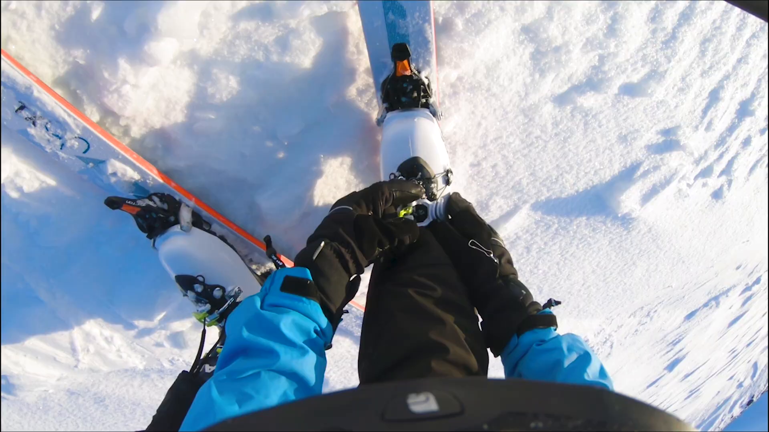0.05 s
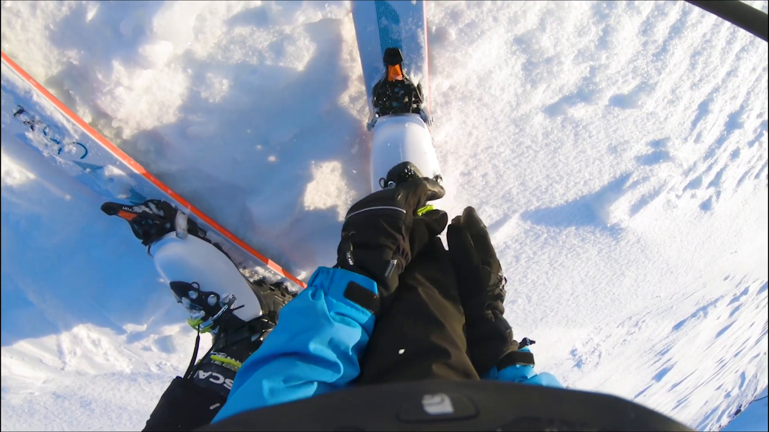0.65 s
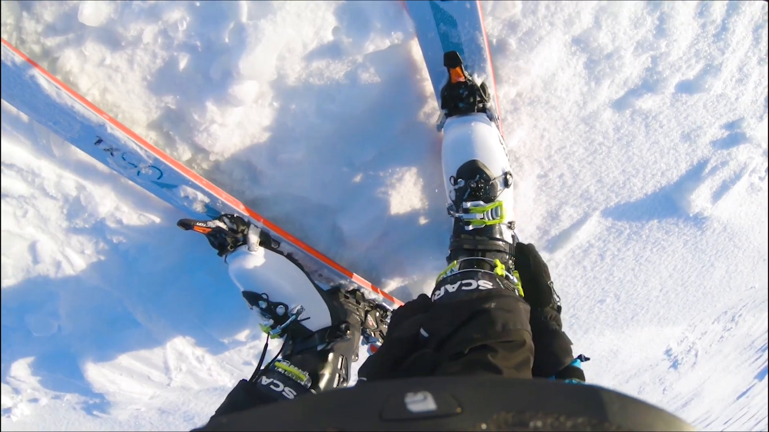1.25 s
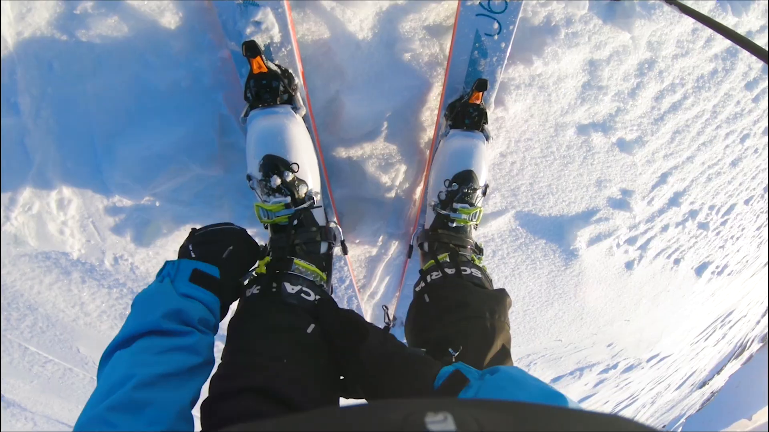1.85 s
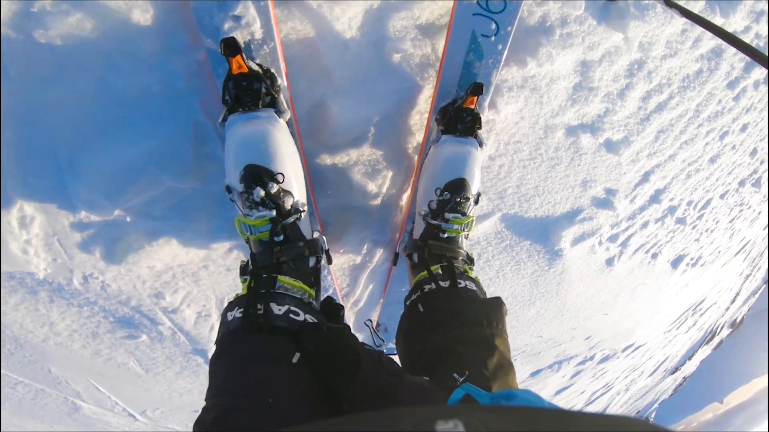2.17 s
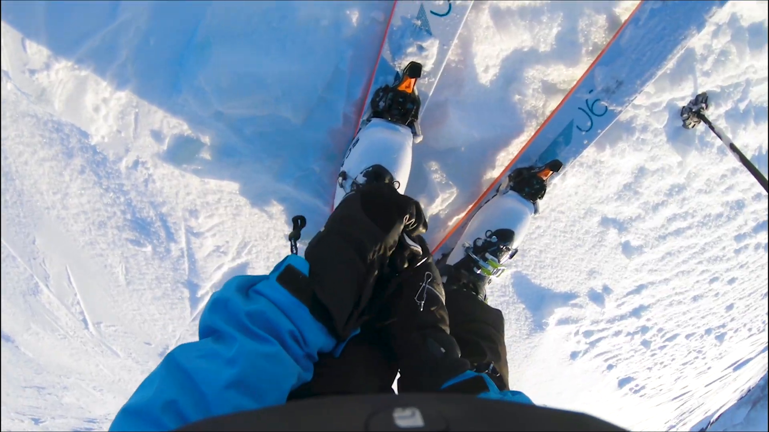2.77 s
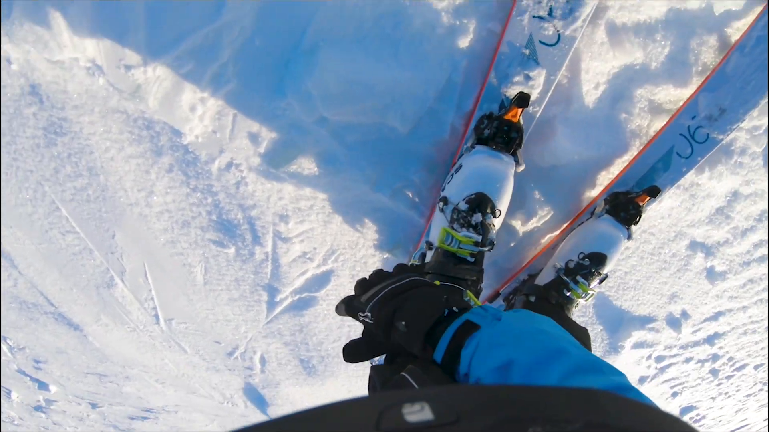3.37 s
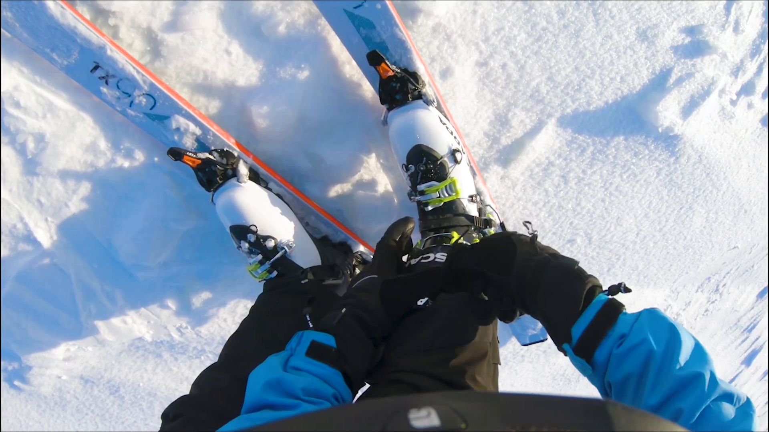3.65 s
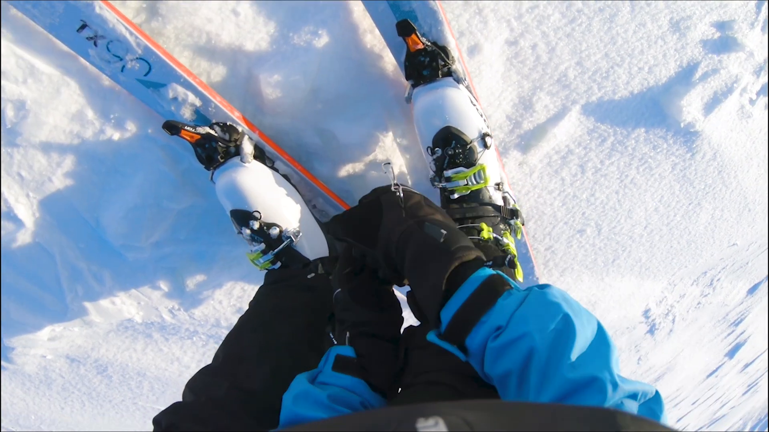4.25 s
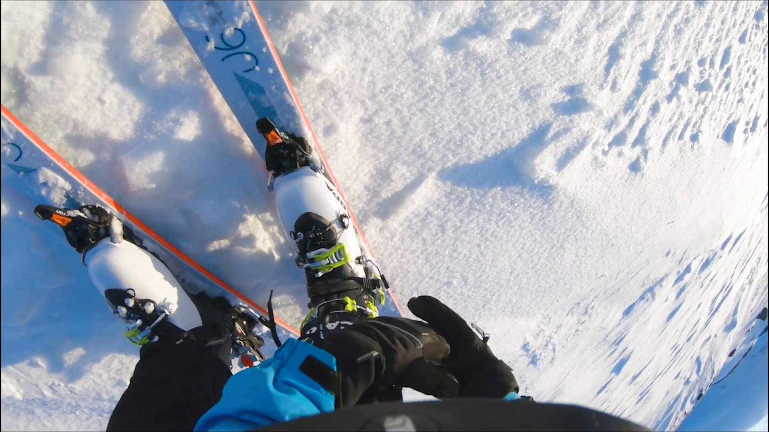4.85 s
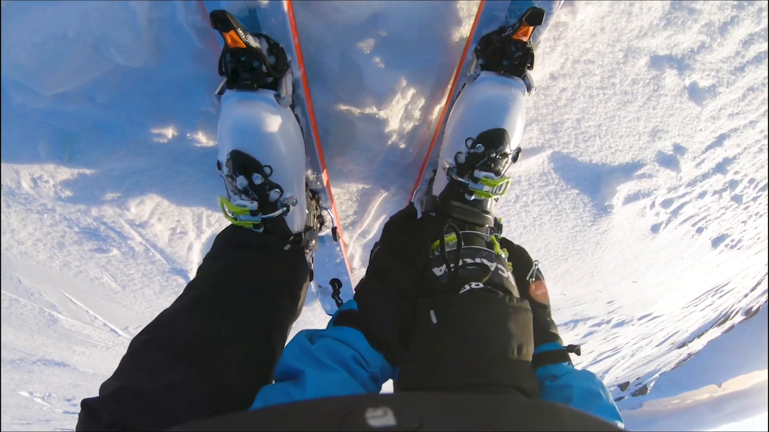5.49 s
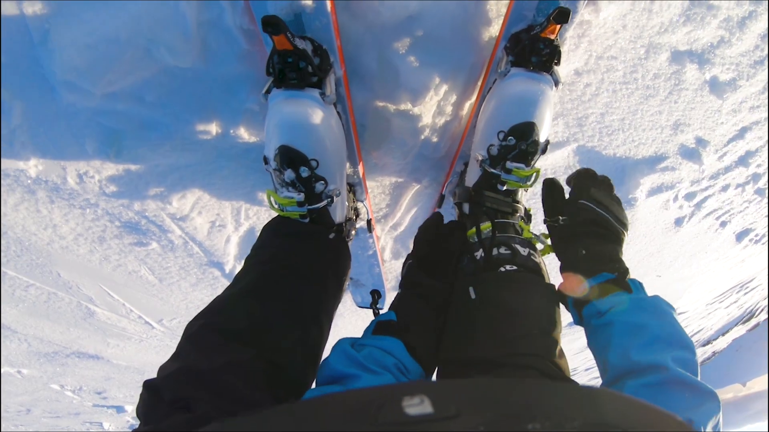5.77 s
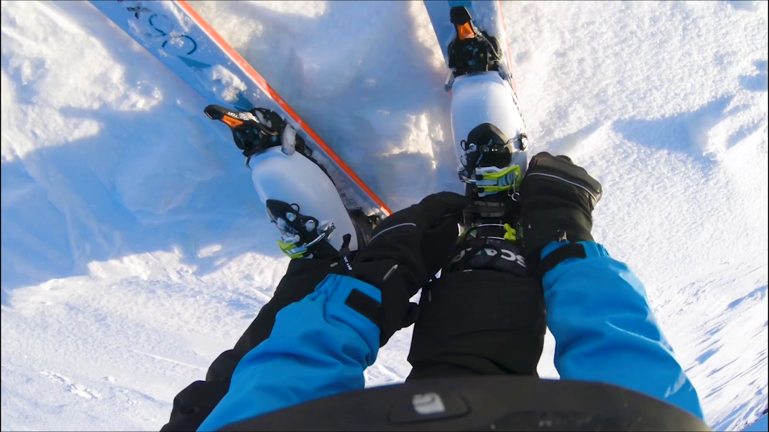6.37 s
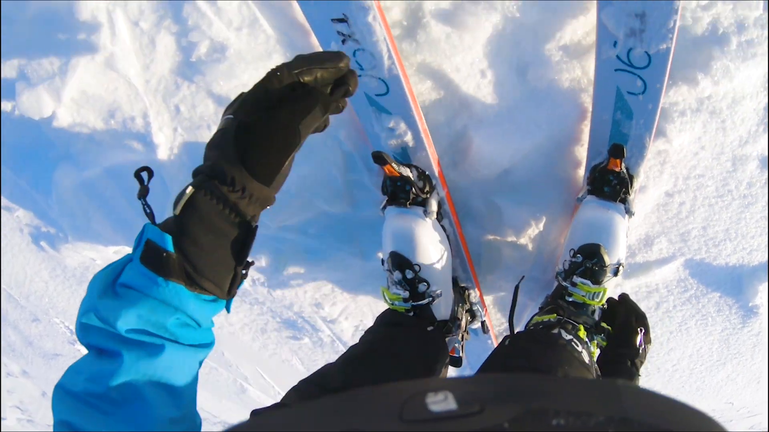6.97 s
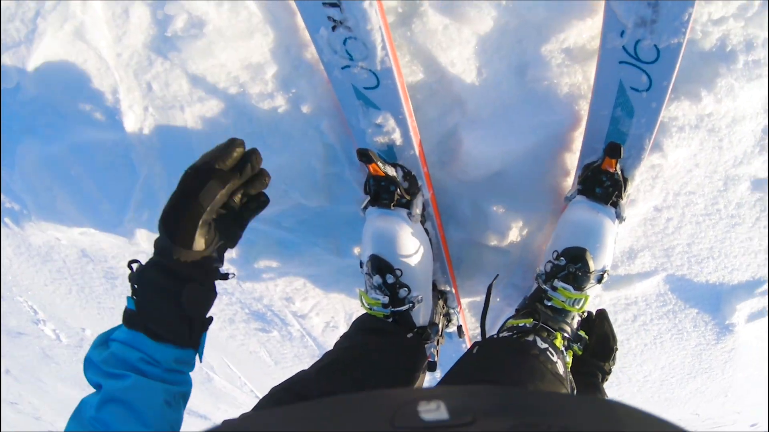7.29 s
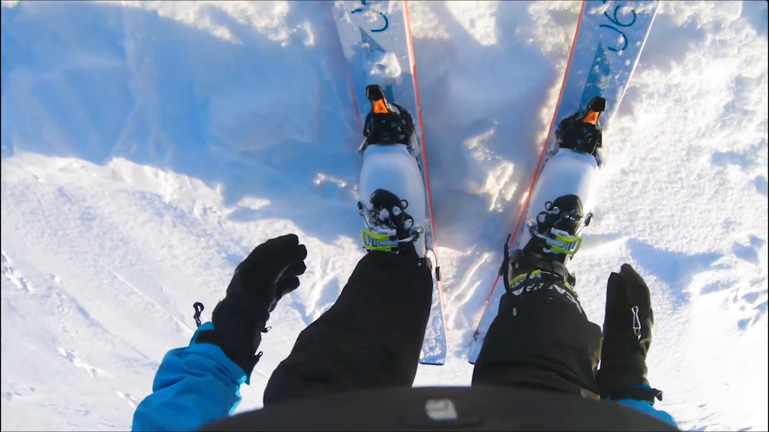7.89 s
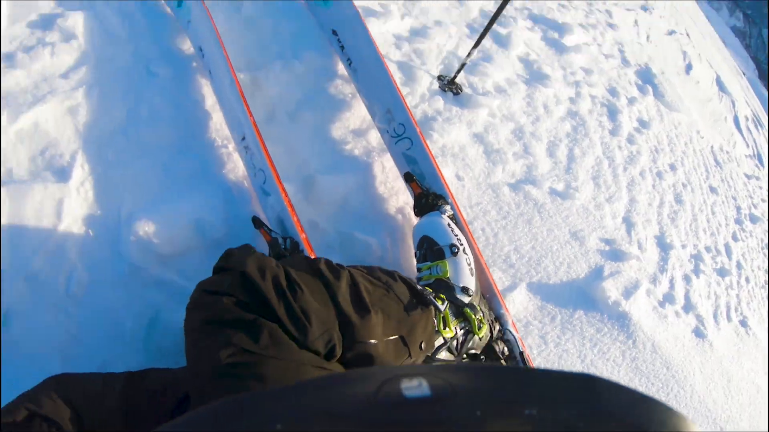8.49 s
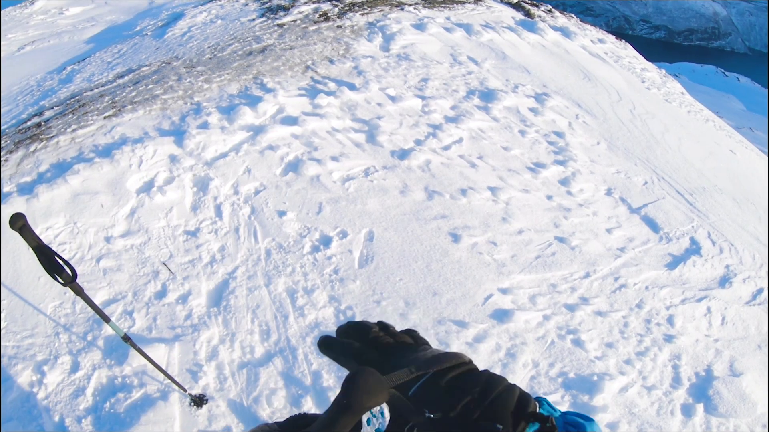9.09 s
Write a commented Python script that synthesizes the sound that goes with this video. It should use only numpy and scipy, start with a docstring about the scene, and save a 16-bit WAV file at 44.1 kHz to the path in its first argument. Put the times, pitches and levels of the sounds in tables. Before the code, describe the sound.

A skier fastens plastic ski boots on crusty snow, heard close from a helmet microphone. Buckles and bindings snap first, then two hook-and-loop straps rip open and a ratchet ticks. More buckles shut, a cuff creaks, and another ratchet is cranked tight before a last snap and swishing sleeves. Throughout, skis grind in the snow, nylon rustles and light wind buffets the microphone, with occasional low thumps.

```python
"""A skier on crusty snow closes the ski boots, heard from a helmet camera. First, buckles and bindings
snap on the plastic shells. Two hook-and-loop straps are ripped open, then a ratchet ticks. More buckles
shut, a cuff creaks, a ratchet buckle is cranked tight, and at the end the skier straightens up with
swishing sleeves. All along, skis grind in the snow, nylon clothes rustle, light wind buffets the
microphone and now and then the helmet mount shudders."""
import sys
import numpy as np
from scipy import signal
from scipy.fft import rfft, irfft, next_fast_len
from scipy.io import wavfile
from scipy.ndimage import map_coordinates

SR = 44100
rng = np.random.default_rng(int(sys.argv[2]) if len(sys.argv) > 2 else 0)


def pcm_store(signal):
    """Save signal as 16-bit PCM."""
    levels = np.round(np.clip(np.atleast_2d(signal), -1, 1) * 32767)
    wavfile.write(sys.argv[1], SR, levels.astype(np.int16).T)


N = 402633
LEAD_S = .003  # a faint noise rises for this long just before each click
PLASTIC_TOP_HZ = 6950  # the boot rings little above this

# tones of a knocked boot shell: pitch_hz, width_hz, level_db
SHELL_TONES = [(189, 70, 0), (380, 163, -4), (490, 105, -1.5), (721, 225, 0), (917, 185, 1.5),
               (1112, 260, 0), (1600, 540, -9)]
# tones of the air and walls of a closed boot: pitch_hz, width_hz, level_db
HOLLOW_TONES = [(366, 35, -14), (550, 28, -5.5), (824, 45, 0.5), (1127, 29, 5.5), (1290, 50, -7)]


def amp(db):
    """Turns decibels into a gain."""
    return np.exp(np.asarray(db) * (np.log(10) / 20))


def unit(x):
    """Scales a signal to an average (rms) level of 1."""
    return x / np.sqrt(np.mean(x ** 2) + 1e-20)


def sized(x):
    """Gives a short stereo sound the energy of 1 ms at level 1."""
    return x / np.sqrt(np.sum(x ** 2) / (2 * SR / 1000))


def along(points, hz):
    """Reads between (Hz, value) points on a log axis."""
    point_hz, values = np.transpose(points)
    return np.interp(np.log(hz + 1), np.log(point_hz + 1), values)


def curves(rows):
    """One value per sample for each column after the time."""
    times, *columns = np.transpose(rows)
    return [np.interp(np.arange(N) / SR, times, column) for column in columns]


def wobble(rate, step=16):
    """A smooth curve through rate random values a second."""
    steps = np.arange(0, N + step, step)
    coarse = map_coordinates(rng.standard_normal(int(N * rate / SR) + 4), [steps * rate / SR])
    return np.interp(np.arange(N), steps, coarse)


def panned(left_db):
    """Two gains, the left one left_db louder than the right."""
    return unit(amp([[left_db / 2], [-left_db / 2]]))


def add(track, start_s, sound):
    """Mixes a sound into a track."""
    k = int(np.clip(round(start_s * SR), 0, N - 1))
    track[:, k:k + sound.shape[1]] += sound[:, :N - k]


def swells(rows, rise_s, fall_s, arch_db=0):
    """A gain curve from (start_s, length_s, level_db) rows, each arch_db weaker at its ends."""
    gain = np.zeros((1, N))
    for start, length, db in rows:
        t = np.arange(int(length * SR)) / SR
        edges = np.clip(np.minimum(t / rise_s, (length - t) / fall_s), 0, 1)
        arch = amp(db - arch_db * (2 * t / length - 1) ** 2)
        add(gain, start, (edges * arch)[None])
    return gain[0]


def filtered(x, response):
    """Filters x by a function of frequency."""
    size = 2 * next_fast_len(x.shape[-1] // 2 + 2048)
    return irfft(rfft(x, size) * response(np.fft.rfftfreq(size, 1 / SR)), size)[..., :x.shape[-1]]


def colour(points, hz):
    """A filter with the given (Hz, dB) spectrum that never sounds ahead of its input."""
    cepstrum = irfft(np.log(amp(along(points, hz))))
    half = len(cepstrum) // 2
    cepstrum[1:half] *= 2
    cepstrum[half + 1:] = 0
    return np.exp(rfft(cepstrum))


def resonances(tones, hz):
    """A filter that rings at (pitch_hz, width_hz, level_db) tones; wider ones die sooner."""
    return sum((-1) ** k * amp(db) * 1j * hz * width / (pitch ** 2 - hz ** 2 + 1j * hz * width)
               for k, (pitch, width, db) in enumerate(tones))


def ringing(x, tones, top_hz=PLASTIC_TOP_HZ, pitch_ratio=1, steepness=4):
    """Lets x ring an object's tones, dulled above top_hz."""
    return filtered(x, lambda hz: resonances(tones, hz / pitch_ratio) / (1 + (hz / top_hz) ** steepness))


def stereo(pair, spectrum):
    """Turns two unrelated noises into a partly alike left and right with the given spectrum."""
    # how alike the two sides are: pitch_hz, likeness (1 = the same)
    likeness = [(40, 0.21), (200, 0.59), (700, 0.46), (3000, 0.92), (5000, 0.91), (7000, 0.47),
                (15000, 0.13)]

    def response(hz):
        angle = np.arccos(along(likeness, hz)) / 2
        return colour(spectrum, hz) * [np.cos(angle), np.sin(angle)]
    mid, side = filtered(pair, response)
    return unit(np.array([mid + side, mid - side]))


def grains(per_s, spread_db, life_s, smooth):
    """Two noises made of tiny breaks of uneven size, over a share of smooth hiss."""
    sizes = amp(spread_db * np.minimum(rng.exponential(size=N), 4))
    sizes *= rng.random(N) < per_s / SR
    power = signal.lfilter([1], [1, -np.exp(-1 / (life_s * SR))], sizes ** 2 / per_s)
    return np.sqrt(power / power.mean() + smooth ** 2) * rng.standard_normal((2, N))


def contact(chatter_s, rattle_db, rattle_s, width, blow_db=-3):
    """A faint rise of noise, one clean blow, then chatter and rattle, each 60 dB down in its time."""
    t = np.arange(SR // 12) / SR - LEAD_S
    dying = amp(-60 * np.abs(t) / chatter_s) + amp(rattle_db - 60 * np.abs(t) / rattle_s)
    rising = amp(-19.5 + 12 * t / LEAD_S)
    mid, side = rng.standard_normal((2, len(t))) * np.where(t < 0, rising, dying)
    mid += amp(blow_db) * np.linalg.norm(mid) * signal.unit_impulse(len(t), int(LEAD_S * SR))
    return np.array([mid + width * side, mid - width * side])


def buckles():
    """Levers and a ratchet's catch strike home: the metal rings briefly and knocks the shell."""
    # levers shutting: time_s, level_db, knock_db, left_db, tones as (pitch_hz, level_db)
    levers = [(0.6622, -4.5, -6.5, 3.5, [(2050, -3), (2650, -1.5), (3750, 1), (4200, 2.5), (7200, -5)]),
              (1.1233, -8, -4, -1.5, [(1400, -9), (2700, 3.5), (3550, -4.5), (5700, -1), (6700, -0.5)]),
              (5.5565, -11, -4.5, -2, [(1450, -3), (2300, 0), (4300, -4), (6100, 1.5), (6900, 0)]),
              (6.2205, -11.5, -3, -2.5, [(2200, 1.5), (3450, -1), (3900, -7.5), (5900, 2.5), (6750, -4)]),
              (7.562, -7.5, -6, -6.5, [(3000, -0.5), (4000, -1.5), (5700, -6), (6800, 2), (8000, 4)]),
              (8.481, -5.5, -10.5, -2.5, [(2500, -1), (3600, 0.5), (5600, -3), (6500, -1), (7450, 3)])]
    # a ratchet buckle cranked tight: time_s, level_db, knock_db, left_db
    clicks = [(7.796, -18, -11, 2), (7.802, -20.5, -9, -4), (7.8363, -11.5, -10, -2.5), (7.8624, -27, 4, 2),
              (7.883, -10.5, -5, -1), (7.897, -13.5, -7, 1.5), (7.9109, -10.5, -13, 1.5)]
    # tones of its catch: pitch_hz, level_db
    catch_tones = [(1120, -1.5), (2400, 2.5), (3000, -5.5), (6300, 4.5), (7100, 4.5)]
    # the bare tick under the tones: pitch_hz, level_db
    tick_spectrum = [(500, -29), (2000, -16), (7000, -10.5), (9500, -28), (12000, -30), (16000, -46)]
    out = np.zeros((2, N))
    for start, db, knock_db, left_db, tones in list(levers) + [(*row, catch_tones) for row in clicks]:
        def metal(hz):
            ring = resonances([(pitch, 380, level) for pitch, level in tones], hz)
            tick_and_ring = colour(tick_spectrum, hz) + ring / (1 + (hz / 9500) ** 8)
            width = np.clip((hz / 6500) ** 2, .25, 1.3)  # high tones spread wider
            return np.array([tick_and_ring, tick_and_ring * width])
        left, right = contact(chatter_s=.012, rattle_db=-23.5, rattle_s=.061, width=.98, blow_db=1)
        mid, side = filtered(np.array([left + right, left - right]), metal)
        click = sized(np.array([mid + side, mid - side]))
        knock = ringing(contact(chatter_s=.0046, rattle_db=-21, rattle_s=.056, width=.35), SHELL_TONES)
        add(out, start - LEAD_S, amp(db) * panned(left_db) * (click + amp(knock_db) * sized(knock)))
    return out


def snaps():
    """Loose catches, bindings and hard crust crack and knock the boot shell, with a bright, high ring."""
    # snaps: time_s, level_db, knock_db, ring_db, pitch_hz, left_db
    hits = [(0.0105, -17.5, -2, 2.5, 2460, -3.5), (0.414, -27, -25, 2, 3700, -1),
            (0.5723, -32, -18, -5, 2610, 0), (0.6021, -28, -7, -6, 3020, 0),
            (0.807, -32, -12, -2, 1990, 14), (0.8169, -30, -0.5, -6, 1580, 12),
            (0.933, -39.5, -19, 23, 5000.0, -1.5), (0.956, -28, 0, -4, 2090, -0.5),
            (1.1202, -27.5, 4, 0.5, 3320.0, 1), (1.262, -13, -2.5, -22, 2630, 1),
            (1.4248, -28.5, -3, -12, 1900, 1), (1.502, -25.5, -1, -13, 1900, -2),
            (1.536, -30, 3, -5, 2940, 0), (1.6282, -17.5, 0.5, -9, 2900, 0),
            (1.6613, -14.5, 0, -2, 2450, -4), (1.7656, -23, 1, 0.5, 2380, -2.5),
            (2.1724, -17, 4, -9, 3340, 2.5), (2.1893, -12, -2.5, -3.5, 1430, 5),
            (2.3208, -22, -5.5, -14, 3170, 5.5), (3.1443, -32, 7, -10, 1500, 0),
            (3.274, -32.5, -10, -5, 1720.0, 3), (3.5787, -36, 4.5, -13, 2570, -8),
            (4.37, -32.5, 0.5, -18, 2600, 6), (4.578, -22.5, -5, -24, 3280, 5),
            (4.6306, -31.5, -1, -16, 2280, 4), (4.903, -30.5, 2, -16, 3520, 3.5),
            (5.37, -32, -29, 1, 3960, -1), (5.407, -27.5, -14, -3, 3570, -1),
            (5.4699, -16.5, -8, -13, 3530, -1.5), (5.853, -30, -22, 2.5, 3750.0, -4),
            (5.8775, -28.5, 1, -2, 3100, -4), (6.0555, -20, -6, -11, 3740, 0.5),
            (6.112, -17, -7, 5, 4640, 1), (6.375, -36, -8, 10.5, 4900, 1),
            (6.386, -42, -22, 15, 4180.0, -1), (6.441, -31, -12.5, 5.5, 3900, 1),
            (6.529, -29, -17, -4.5, 3040, -1), (6.5615, -31, -31, -9, 3330, 6),
            (6.901, -30.5, -10, 4, 1810.0, 1), (6.9115, -17.5, -3.5, -0.5, 1580, -4.5),
            (6.9736, -31.5, 4.5, 2, 1510.0, -2.5), (6.995, -30, -6, -3, 2710.0, 3),
            (7.0547, -21.5, 7, 3.5, 3520, 1), (7.133, -30, -6, -6, 2230, -12),
            (7.1458, -26.5, -6, 4, 2930, 6), (7.1526, -40.5, 19, 18, 2450.0, -5),
            (7.201, -37.5, 9, 3.5, 2400, -1), (7.404, -27.5, 7, 1, 1720.0, 1),
            (7.6462, -27, -1.5, 0, 2970.0, -3), (7.7629, -16.5, 6, -3.5, 1480, -3),
            (8.072, -15, 2.5, -2.5, 2410.0, 0.5), (8.123, -14, -7.5, -19, 2900, 0),
            (8.141, -17.5, -11, -1, 2670, 1), (8.1437, -21, -13, 7.5, 2670.0, 4),
            (8.4791, -26, -7, -2, 2440, -5.5), (8.689, -33.5, 0, -12, 2920, -3),
            (8.737, -32, 2, -13, 4500, 3), (8.7392, -30, -10, -10.5, 4460, 1),
            (9.012, -36.5, -12, -19, 2320, -3)]
    # the sharp crack: pitch_hz, level_db
    crack_spectrum = [(500, -56.5), (1300, -0.5), (2000, 8), (4300, 8.5), (5600, -22.5), (9000, -39),
                      (16000, -81)]
    # a bright, high ringing heard with each snap: pitch_hz, level_db
    ring_spectrum = [(3500, -22), (5300, -1.5), (6600, 2.5), (7600, -4), (8600, -19), (11000, -31.5),
                     (16000, -47)]
    out = np.zeros((2, N))
    for start, db, knock_db, ring_db, pitch, left_db in hits:
        def cracking(hz):
            peaks = resonances([(pitch, 600, 0)], hz) + resonances([(pitch / 2, 400, -7)], hz)
            return colour(crack_spectrum, hz) * (.47 + peaks)
        crack = filtered(contact(chatter_s=.013, rattle_db=-24, rattle_s=.031, width=.18), cracking)
        knock = ringing(contact(chatter_s=.0027, rattle_db=-14, rattle_s=.04, width=.32), SHELL_TONES)
        ring_hit = contact(chatter_s=.009, rattle_db=-25, rattle_s=.048, width=.62)
        ring = filtered(ring_hit, lambda hz: colour(ring_spectrum, hz))
        snap = amp(.4) * sized(crack) + amp(ring_db + 2) * sized(ring)
        snap += amp(knock_db + .95) * sized(knock) * panned(-1.3)
        add(out, start - LEAD_S, amp(db) * panned(left_db) * snap)
    return out


def straps():
    """Slow pulls pop single hooks, fast ones tear thousands; the backing rasps, the strap adds body."""
    # pulls that peel a strap: start_s, length_s, tear_db, rasp_db, body_db, hooks_per_s
    pulls = [(2.382, 0.07, -42, -5, -23, 670), (2.44, 0.089, -29.5, -11, -22, 3800),
             (2.518, 0.048, -40.5, -14, -28, 2500), (2.558, 0.091, -34.5, -13, -19, 4500),
             (2.64, 0.081, -31, -13.5, -14, 6000), (2.704, 0.065, -26, -17.5, -14, 6300),
             (2.756, 0.094, -31, -17.5, -13.5, 2800), (2.909, 0.053, -44, -11, -13, 900),
             (2.986, 0.049, -33.5, -26, -13, 2000), (3.646, 0.047, -33, -3.5, -15, 4000),
             (3.68, 0.094, -45, 6, -31, 2500), (3.769, 0.041, -40.5, 7, -25, 6200),
             (3.797, 0.11, -32.5, -6, -12.5, 6900), (3.891, 0.24, -32.5, -6, -8, 6200),
             (4.118, 0.093, -41.5, -2, -8, 1500), (4.201, 0.054, -30.5, -7, -7, 3600),
             (4.256, 0.08, -27.5, -8.5, -12, 4500)]
    # rows of hooks giving way at once: time_s, tear_db, rasp_db
    tugs = [(2.398, -36.5, -4.5), (2.413, -32, -5), (2.424, -31, -9), (2.794, -30, -14.5),
            (2.957, -36.5, -11), (2.975, -37.5, -8), (3.65, -25, -1.5), (7.166, -28, -8),
            (7.173, -31.5, -11)]
    # the tearing hooks: pitch_hz, level_db
    hook_spectrum = [(250, -24.5), (700, -19), (1600, -10.5), (2500, -13), (3400, -2.5), (4800, -6.5),
                     (6000, -0.5), (7100, 4), (8300, -10), (9500, -12.5), (10800, -23.5), (12500, -23),
                     (16000, -32.5)]
    # the rasping backing: pitch_hz, level_db
    rasp_spectrum = [(400, -33), (1000, -18), (1650, -15), (2100, -3), (2700, 3), (3400, -3.5), (4500, -13),
                     (7000, -26)]
    # the tight strap: pitch_hz, level_db
    body_spectrum = [(200, -7.5), (500, -7.5), (1000, 3.5), (1500, 10), (2200, -18), (5000, -42.5)]
    pull_edges = dict(rise_s=.012, fall_s=.015)
    tear = swells([(s, length, db + 2) for s, length, db, *_ in pulls], **pull_edges)
    rasp = swells([(s, length, db + extra + 1) for s, length, db, extra, *_ in pulls], **pull_edges)
    body = swells([(s, length, db + extra) for s, length, db, _, extra, _ in pulls], **pull_edges)
    hooks_per_s = np.exp(curves([(s + length / 2, np.log(hooks)) for s, length, *_, hooks in pulls])[0])
    for start, tear_db, rasp_db in tugs:
        tug = swells([(start - LEAD_S / 2, .007, 0)], rise_s=.0007, fall_s=.0035)
        tear += amp(tear_db) * tug
        rasp += amp(tear_db + rasp_db) * tug
        hooks_per_s += 6000 * tug
    jerk_db = np.where(np.arange(N) / SR < 3.3, 1.6, 1.1)  # the first strap tears more jerkily
    pops = amp(jerk_db * wobble(170)) * grains(hooks_per_s, spread_db=3, life_s=.0003, smooth=.28)
    return (tear * stereo(pops, hook_spectrum) + rasp * stereo(pops, rasp_spectrum)
            + body * stereo(pops, body_spectrum))


def ratchet(teeth=8, start_s=4.939, gap_s=.0121, slowing=1.16):
    """A toothed strap ticks past its catch, slowing as it tightens; the catch rebounds between teeth."""
    # tones of one tick: pitch_hz, width_hz, level_db
    tooth_tones = [(1165, 106, 2.5), (1570, 440, -3), (2410, 710, -3.5), (3000, 560, -2.5), (3860, 730, -9)]
    out = np.zeros((2, N))
    for _ in range(teeth):
        for when, db in ((start_s, -24), (start_s + gap_s / 2, -35)):  # tooth, then rebound
            hit = contact(chatter_s=.003, rattle_db=-8, rattle_s=.05, width=.4)
            click = ringing(hit, tooth_tones, top_hz=5500)
            add(out, when - LEAD_S, amp(db) * panned(3.4) * sized(click))
        start_s += gap_s
        gap_s *= slowing
    return out


def cuff_creak():
    """The cuff sticks and slips unevenly; the slips ring the hollow boot, higher or lower with flex."""
    # the creak over time: time_s, tick_db, ring_db
    levels = [(6.62, -59, -63), (6.7, -44.5, -62), (6.78, -52.5, -75), (6.87, -46.5, -57),
              (7.05, -47, -50.5), (7.21, -56, -40), (7.28, -62, -76), (7.33, -51, -43.5), (7.42, -52, -43),
              (7.46, -75, -63)]
    # tones of the cuff: pitch_hz, width_hz, level_db
    cuff_tones = [(1100, 450, -4.5), (1750, 340, -0.5), (2860, 1040, -4), (6750, 600, -4.5)]
    slips_per_s = 80 * amp(2.6 * wobble(30))
    slip_count = np.floor(np.cumsum(slips_per_s) / SR)
    slips = np.diff(slip_count, prepend=0) * amp(2.4 * rng.standard_normal(N))
    flexed = wobble(14) > 0
    ticks = ringing(slips, cuff_tones, top_hz=8000, steepness=10)
    high_ring = ringing(slips * ~flexed, HOLLOW_TONES)
    low_ring = ringing(slips * flexed, HOLLOW_TONES, pitch_ratio=1 / 1.09)
    tick_db, ring_db = curves(levels)
    t = np.arange(N) / SR
    gate = np.clip(np.minimum(t - levels[0][0], levels[-1][0] - t) / .003 + 1, 0, 1)
    return gate * (amp(tick_db) * unit(ticks) + amp(ring_db) * unit(high_ring + low_ring))


def boot_bumps():
    """The closed boot rings hollow when a catch shuts or the shin bumps the cuff."""
    # bumps: time_s, level_db, pitch_ratio, top_hz
    bumps = [(2.172, -18, 0.92, 700), (6.112, -14, 1.0, 1800), (6.222, -19, 0.9, 500),
             (6.24, -20, 0.9, 1100), (7.404, -21, 0.96, 1500), (7.421, -24, 0.96, 1500)]
    out = np.zeros((2, N))
    for start, db, pitch_ratio, top_hz in bumps:
        hit = contact(chatter_s=.004, rattle_db=-22, rattle_s=.06, width=.4)
        add(out, start - LEAD_S, amp(db) * sized(ringing(hit, HOLLOW_TONES, top_hz, pitch_ratio)))
    return out


def crust_crunches():
    """Under boots and skis the crust gives way in short bursts of breaking grains."""
    # crunches: start_s, length_s, level_db
    crunches = [(0, 0.012, -26), (0.081, 0.037, -42.5), (1.258, 0.022, -31), (1.434, 0.041, -45),
                (1.504, 0.0085, -44.5), (1.538, 0.014, -45.5), (2.167, 0.021, -30.5), (3.267, 0.012, -38),
                (3.379, .02, -47.5), (7.152, 0.026, -29.5), (7.77, 0.0094, -26), (7.804, 0.015, -38.5),
                (8.085, 0.077, -28), (8.138, 0.032, -25.5)]
    # the breaking crust: pitch_hz, level_db
    crust_spectrum = [(100, 3.5), (250, 10), (450, 0.5), (800, 7.5), (1600, -1.5), (3000, 1.5),
                      (4700, -3.5), (6800, 1.5), (8000, -7.5), (9500, -21), (16000, -42)]
    t, gain = np.arange(N) / SR, np.zeros(N)
    for start, length, db in crunches:
        corners_s = [start - .002, start + .0034, start + length * .78, start + length * .93 + .002]
        gain += amp(db) * np.interp(t, corners_s, [.0046, .94, 1, .0012])
    return gain * stereo(grains(per_s=900, spread_db=4, life_s=.0006, smooth=.6), crust_spectrum)


def grinding_skis():
    """The skis grind ice grains and ring with them."""
    # shifts of weight: start_s, length_s, level_db
    shifts = [(0, 0.146, -42.5), (.49, 0.022, -44.5), (.55, 0.15, -52.5), (.735, 0.17, -53.5),
              (.93, 0.17, -54.5), (1.165, .2, -42.5), (1.39, .2, -40.5), (1.58, 0.2, -44),
              (1.85, 0.16, -55), (2.01, 0.22, -47), (2.23, 0.083, -45.5), (3.025, 0.028, -48),
              (3.14, 0.041, -42), (3.18, 0.175, -56.5), (3.36, 0.078, -47.5), (3.42, 0.079, -56),
              (4.56, 0.195, -49), (4.935, 0.186, -43.5), (5.36, 0.203, -51.5), (5.69, 0.14, -57),
              (5.84, 0.088, -50.5), (6.015, 0.211, -49.5), (6.21, 0.13, -51), (6.665, 0.15, -51.5),
              (6.82, 0.26, -48.5), (7.1, 0.169, -44.5), (7.31, 0.14, -43), (7.46, 0.13, -57),
              (7.745, 0.218, -43), (8.06, 0.12, -42), (8.17, 0.14, -51), (8.33, 0.16, -56),
              (8.555, 0.16, -50.5)]
    # tones of a ski: pitch_hz, width_hz, level_db
    ski_tones = [(750, 170, 9.5), (1000, 230, -0.5)]
    # the grinding snow: pitch_hz, level_db
    snow_spectrum = [(120, -6), (350, 6.5), (700, -4.5), (1150, -3.5), (1700, 0), (2700, -4), (4000, -10.5),
                     (7000, -9), (10000, -42.5)]
    gain = amp(-70) + swells(shifts, rise_s=.0068, fall_s=.021)
    ice = grains(per_s=220, spread_db=4, life_s=.0008, smooth=.6) * amp(1.6 * wobble(30))
    ice_and_ski = filtered(ice, lambda hz: 1 + sum(resonances([tone], hz) for tone in ski_tones))
    return gain * stereo(ice_and_ski, snow_spectrum)


def rustling_clothes():
    """Nylon slides over nylon and never quite keeps still."""
    # arm and leg movements: start_s, length_s, level_db
    rubs = [(0, 0.097, -44), (.38, 0.046, -48), (.43, 0.11, -52), (.53, 0.19, -48), (.745, 0.43, -49),
            (1.19, 0.24, -45.5), (1.4, 0.2, -57), (1.61, 0.087, -45.5), (1.705, 0.063, -38.5),
            (1.76, 0.11, -40.5), (1.85, 0.41, -44.5), (2.23, 0.18, -52.5), (2.84, 0.19, -49),
            (3.02, 0.27, -45), (3.24, 0.27, -51), (3.36, 0.056, -41), (3.41, 0.12, -49.5),
            (3.52, 0.14, -49.5), (4.32, 0.075, -49), (4.38, 0.19, -51), (4.54, 0.35, -42),
            (4.87, 0.34, -42), (5.2, 0.17, -49), (5.35, 0.1, -39), (5.44, 0.14, -50.5), (5.69, 0.17, -43),
            (5.83, 0.082, -37), (5.89, 0.093, -51), (6.29, 0.05, -47), (6.34, 0.068, -38),
            (6.4, 0.14, -49.5), (6.53, 0.31, -54.5), (6.81, 0.49, -43), (7.305, 0.23, -49),
            (7.745, 0.27, -47.5), (8.06, 0.26, -40.5), (8.28, 0.28, -57), (8.56, 0.08, -43.5)]
    # the rubbing nylon: pitch_hz, level_db
    nylon_spectrum = [(300, -24), (1200, -0.5), (2300, -2), (3500, 3.5), (4800, -4.5), (6800, 3.5),
                      (7800, -2.5), (8800, -13), (11000, -27.5), (16000, -37)]
    gain = amp(-69) + swells(rubs, rise_s=.002, fall_s=.056, arch_db=4.5)
    cloth = stereo(grains(per_s=610, spread_db=1.5, life_s=.0017, smooth=.43), nylon_spectrum)
    return gain * cloth * amp(2.6 * wobble(35) - 5.5)


def sleeves():
    """Sleeves brush the jacket in centred swishes; the loose cloth slides on softly after each."""
    # swishes: start_s, fastest_s, end_s, level_db
    swishes = [(8.687, 8.688, 8.73, -28.5), (8.83, 8.934, 8.9, -34), (9.027, 9.057, 9.2, -32)]
    # the brushing cloth: pitch_hz, level_db
    swish_spectrum = [(500, -20.5), (900, -22.5), (2200, -22.5), (3400, -14), (4200, -3.5), (4900, -8.5),
                      (5600, -14), (8300, -51), (14000, -64.5)]
    t = np.arange(N) / SR
    threads = grains(per_s=1300, spread_db=3, life_s=.0013, smooth=.7)[0]
    cloth = unit(filtered(threads, lambda hz: colour(swish_spectrum, hz)))
    brushing = sum(amp(db) * np.interp(t, corners_s, [0, 1, 0]) ** .79 for *corners_s, db in swishes)
    sliding = amp(-50.5) * (t > swishes[0][0])
    return np.hypot(brushing, sliding) * cloth


def glove_strokes(from_hz=990, to_hz=3300):
    """A glove slides along the trousers; the weave sings higher as it speeds up."""
    # strokes: loudest_s, half_length_s, level_db
    strokes = [(0.184, 0.024, -46), (4.757, 0.039, -38), (5.733, 0.018, -41.5)]
    # the sliding glove: pitch_hz, level_db
    glove_spectrum = [(600, -12.5), (1300, -4.5), (2200, -0.5), (3500, 0), (5000, -5), (6600, 7),
                      (8200, -7), (11000, -27), (16000, -30)]
    t, gain, glides = np.arange(N) / SR, np.zeros(N), []
    for peak, half, db in strokes:
        start = peak - 2 * half
        corners_s = [start, peak, peak + half * 1.3, peak + half * 1.4]
        gain += amp(db) * np.interp(t, corners_s, [0, .72, .42, .016])
        glides += [(start, from_hz), (peak + half * 1.2, to_hz)]
    pitch_hz, = curves(glides)
    flutter = signal.lfilter(*signal.butter(2, 380, fs=SR), rng.standard_normal(N))
    weave = unit(flutter * np.sin(2 * np.pi * np.cumsum(pitch_hz) / SR))
    hiss = stereo(rng.standard_normal((2, N)), glove_spectrum)
    return gain * (amp(3) * hiss + amp(-6) * weave)


def mount_jolts():
    """Each jolt shakes the helmet mount, which booms briefly at its low tones."""
    # jolts: start_s, length_s, level_db, left_db, top_hz
    jolts = [(0, 0.083, -30.5, -14, 900), (0.657, 0.061, -30.5, -7.5, 404),
             (1.226, 0.072, -22.5, -17, 1200), (4.998, 0.12, -37, -18, 249), (6.228, 0.13, -41.5, -6, 1000),
             (7.082, 0.084, -36.5, -13, 402), (7.569, 0.055, -33, -5, 300), (7.753, 0.12, -36, -2, 396),
             (8.115, 0.093, -28.5, -1, 1300), (8.75, 0.18, -31, 0, 232), (9.043, 0.06, -25.5, -6, 197)]
    # tones of the mount: pitch_hz, width_hz, level_db
    mount_tones = [(115.7, 44, -1.5), (171, 53, -4.5), (247, 41, -11.5), (490, 470, -22)]
    out, t = np.zeros((2, N)), np.arange(SR // 3) / SR
    for start, length, db, left_db, top_hz in jolts:
        edges = np.clip(t / .00083, 0, 1) * np.clip((length - t) / .1, 0, 1)
        boom = ringing(edges * rng.standard_normal(len(t)), mount_tones, top_hz)
        boom /= np.sqrt(np.sum(boom ** 2) / (length * SR))
        add(out, start, amp(db) * panned(left_db) * boom)
    return out


def mount_shudders():
    """The helmet mount swings at its lowest tone for a few cycles, wavering slightly."""
    # shudders: start_s, length_s, level_db, pitch_hz, left_db
    shudders = [(1.22, 0.073, -14.5, 118.3, -20), (1.27, 0.056, -29, 111.5, -14),
                (8.744, 0.07, -30.5, 114.9, -2), (9.061, 0.086, -26.5, 114, 2)]
    out = np.zeros((2, N))
    for start, length, db, pitch_hz, left_db in shudders:
        wavering_hz = pitch_hz * (1 + .03 * wobble(30))
        swing = unit(np.sin(2 * np.pi * np.cumsum(wavering_hz) / SR))
        out += panned(left_db) * swing * swells([(start, length, db)], rise_s=.01, fall_s=.03)
    return out


def wind():
    """Swirls of air buffet the microphone openings and set the helmet rumbling, more on the right."""
    # puffs over a steady breeze: start_s, length_s, buffet_db, rumble_db
    gusts = [(0, 0.17, -30.5, -35), (0.272, 0.27, -45, -49.5), (0.57, 0.59, -48, -55.5),
             (0.95, 0.46, -40.5, -42), (1.606, 0.34, -38, -51.5), (2.09, 0.45, -43, -44),
             (2.506, 0.45, -39, -47), (2.957, 0.77, -38, -44.5), (3.833, 0.63, -44, -43.5),
             (4.418, 0.37, -45, -53), (4.888, 0.26, -62, -47.5), (5.27, 0.43, -49.5, -52.5),
             (5.74, 0.44, -57, -60), (6.02, 0.37, -41.5, -49.5), (6.385, 0.19, -58, -51),
             (6.704, 1, -47.5, -52.5), (7.536, 0.2, -26, -35), (7.887, 0.48, -39, -45.5),
             (8.248, 0.37, -44.5, -70), (8.477, 0.88, -35.5, -42)]
    # the buffeting air: pitch_hz, level_db
    buffet_spectrum = [(12, 1), (28, 2), (55, -2), (90, -21), (170, -24.5), (400, -79.5)]
    # the rumbling helmet: pitch_hz, level_db
    rumble_spectrum = [(50, -4), (90, -1.5), (118, 2), (170, -6.5), (240, -11), (360, -26.5), (1000, -75)]
    shape = dict(rise_s=.033, fall_s=.14, arch_db=9)
    push = amp(-55.5) + swells([(s, length, db) for s, length, db, _ in gusts], **shape)
    shake = amp(-60) + swells([(s, length, db) for s, length, _, db in gusts], **shape)
    buffet = push * amp(3.5 + .88 * wobble(3)) * stereo(rng.standard_normal((2, N)), buffet_spectrum)
    rumble = shake * amp(1.5 + 3.2 * wobble(22)) * stereo(rng.standard_normal((2, N)), rumble_spectrum)
    return (buffet + rumble) * panned(-9)


def scene():
    """Adds up boots, snow, clothes and helmet."""
    boots = buckles() + snaps() + straps() + ratchet() + cuff_creak() + boot_bumps()
    snow = crust_crunches() + grinding_skis()
    clothes = rustling_clothes() + sleeves() + glove_strokes()
    helmet = mount_jolts() + mount_shudders() + wind()
    return boots + snow + clothes + helmet


def gain_control(x, threshold_db, recover_db_per_s, react_s):
    """Loud peaks turn the level down just after they pass; it then comes back steadily."""
    over_db = np.maximum(20 * np.log10(np.abs(x).max(axis=0) + 1e-9) - threshold_db, 0)
    recovery_db = recover_db_per_s * np.arange(N) / SR
    cut_db = np.maximum.accumulate(over_db + recovery_db) - recovery_db
    smoothing = np.exp(-1 / (react_s * SR))
    return x * amp(-signal.lfilter([1 - smoothing], [1, -smoothing], cut_db))


def record(dry):
    """The camera turns down after loud peaks, clips at full scale and cuts the highest treble."""
    levelled = gain_control(dry, threshold_db=-5.5, recover_db_per_s=85.5, react_s=.04)
    return filtered(np.clip(levelled, -1, 1), lambda hz: 1 / (1 + (hz / 16200) ** 60))


dry = scene()
out = record(dry)
pcm_store(out)
```